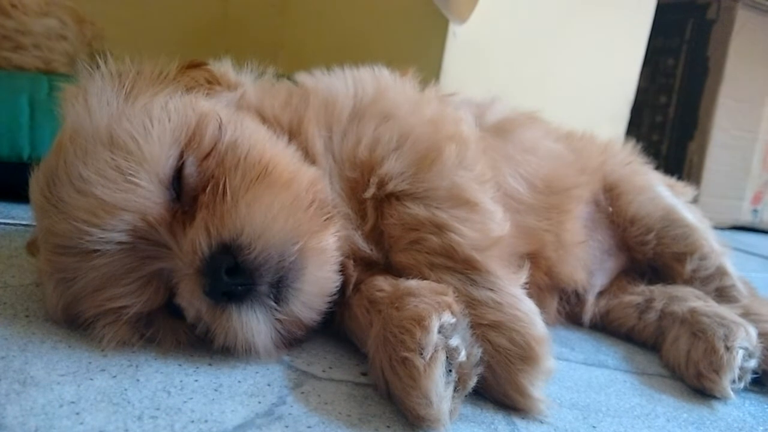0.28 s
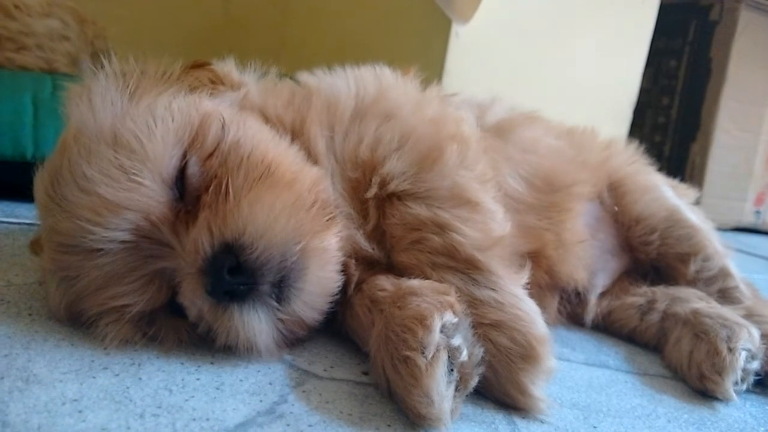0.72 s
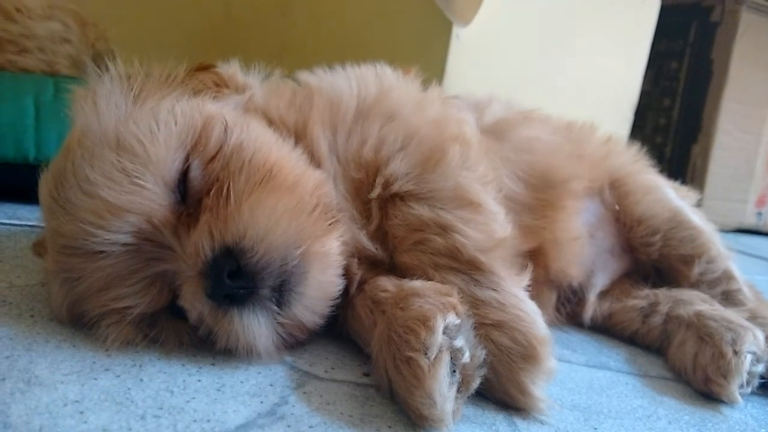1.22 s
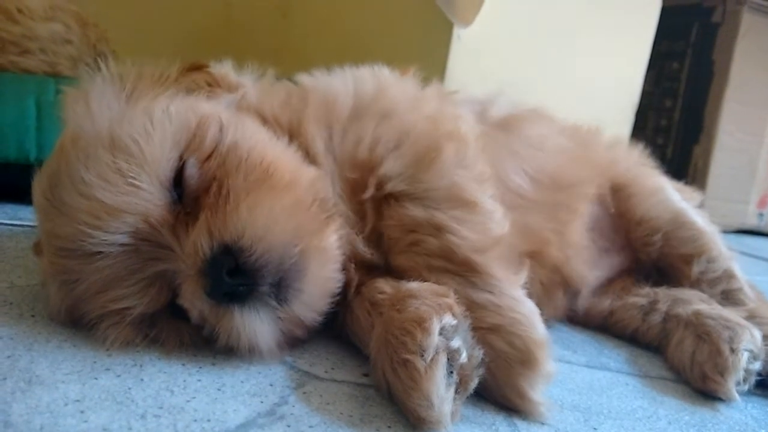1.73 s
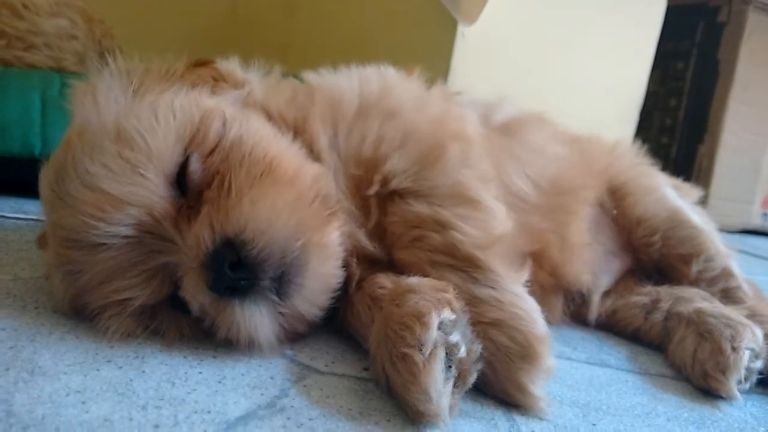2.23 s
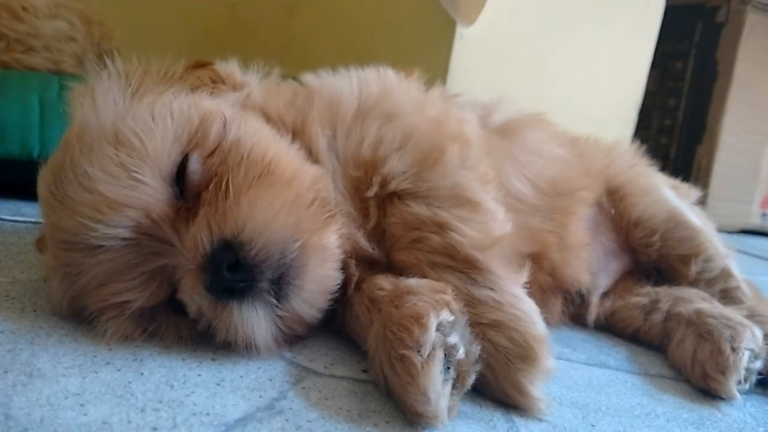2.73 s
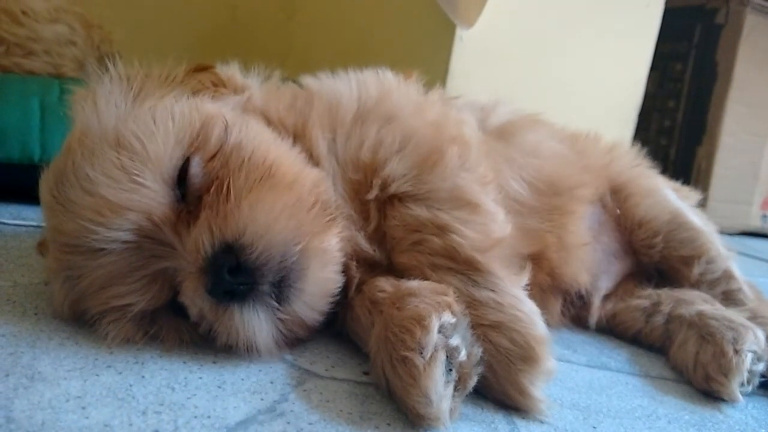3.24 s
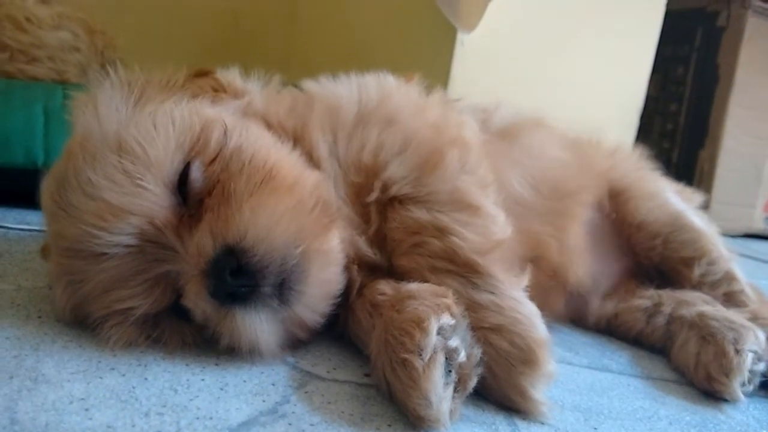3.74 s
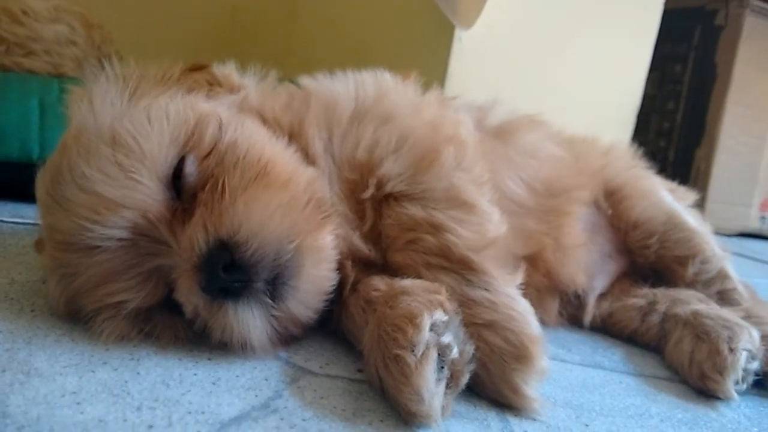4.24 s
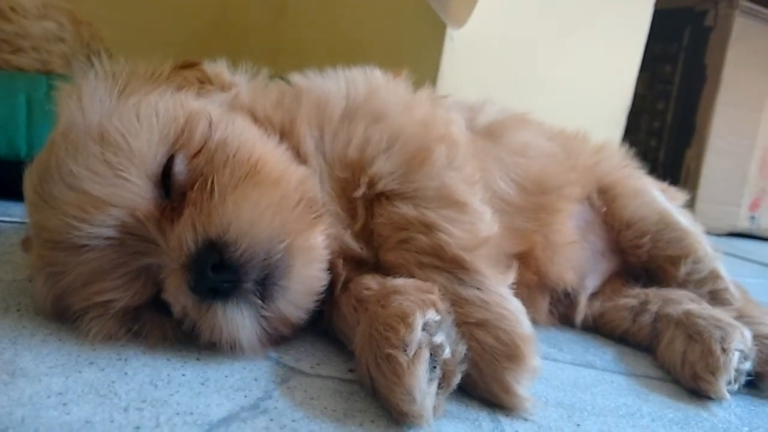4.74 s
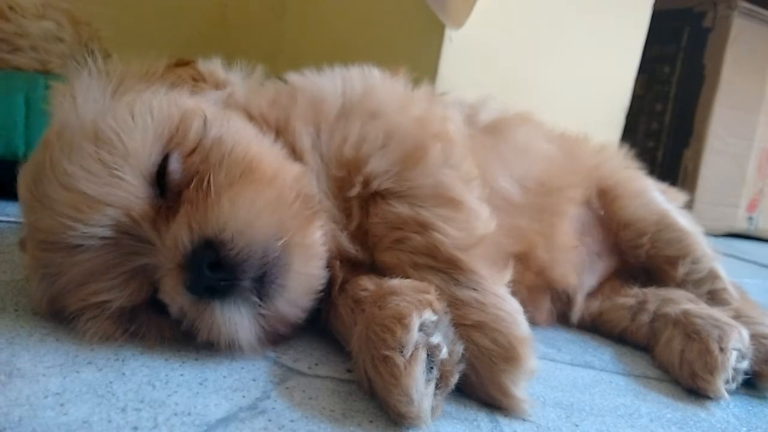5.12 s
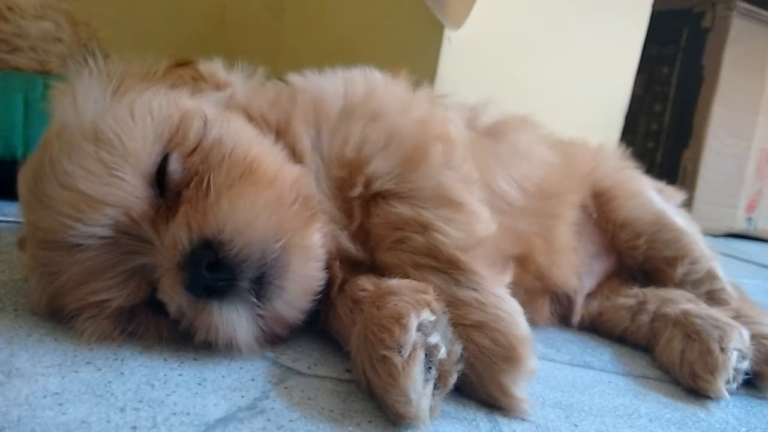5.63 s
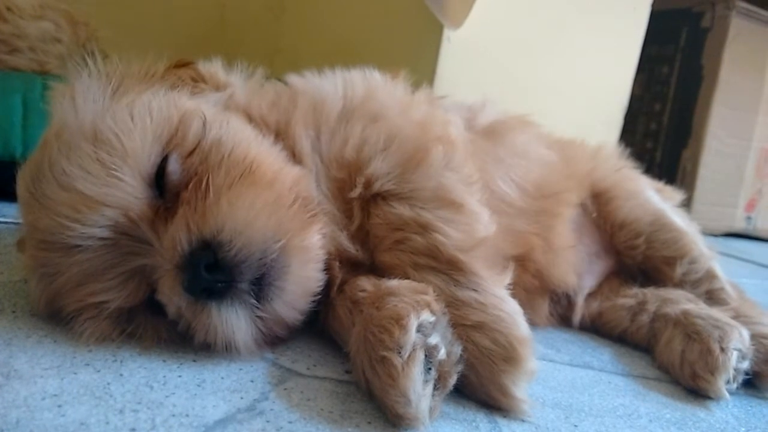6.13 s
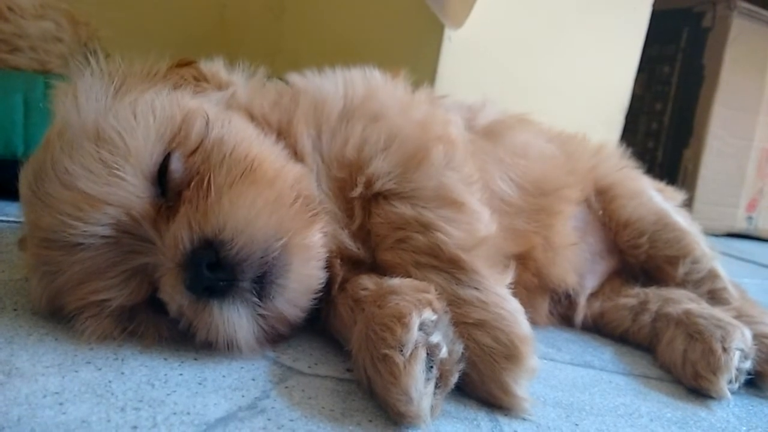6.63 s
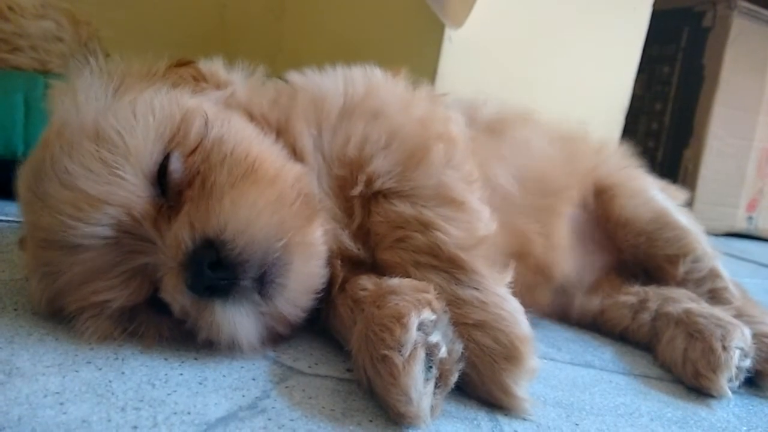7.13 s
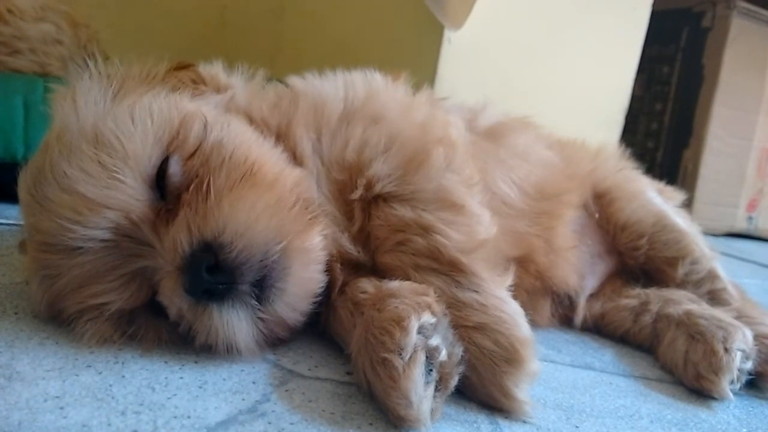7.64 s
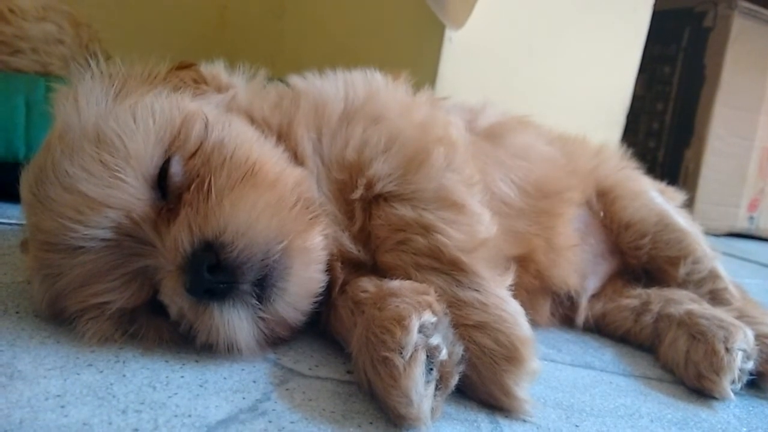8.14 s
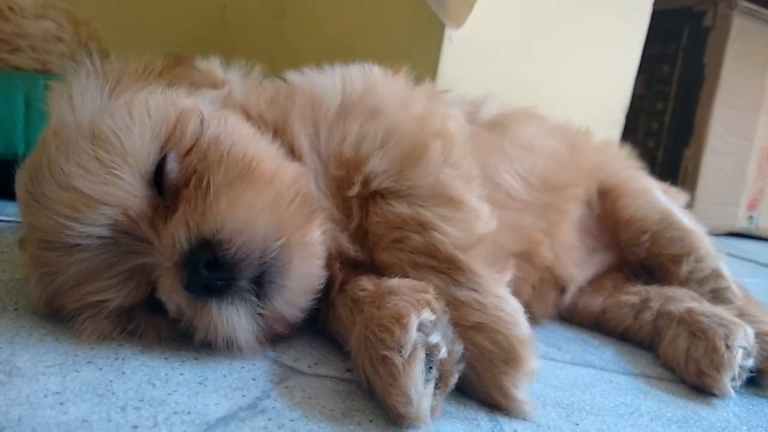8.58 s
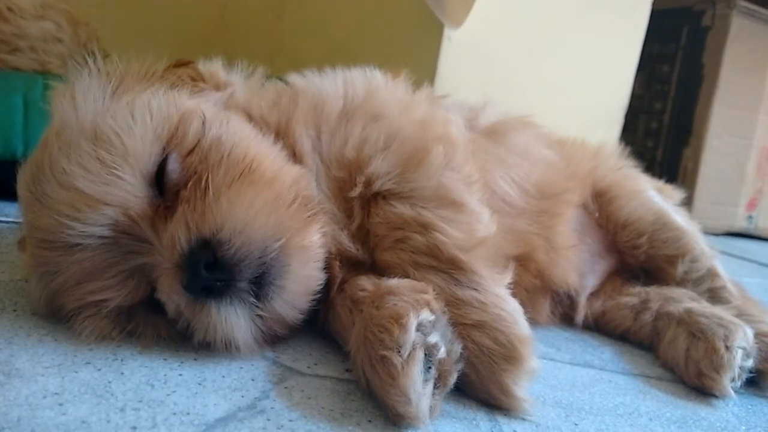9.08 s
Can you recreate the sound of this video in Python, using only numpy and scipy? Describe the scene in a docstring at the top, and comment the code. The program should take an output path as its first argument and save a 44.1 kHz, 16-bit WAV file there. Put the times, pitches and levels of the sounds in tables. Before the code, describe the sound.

A low rumble and faint hiss fill a small room throughout, with a thin sizzle for the first three seconds. A puppy is asleep on the floor, close to the microphone. At about 1.4 seconds it gives a short, fluttering growl that runs straight into two tiny, high yips, each a quick upward glide of an almost pure tone. More pairs follow at about 3.4 and 3.7 seconds, 4.9 and 5.2 seconds, and 6.9 and 7.2 seconds. A last single yip, the loudest, comes at 8.5 seconds. Five of the yips end in a thin whistle through the nose, and small wet mouth clicks and puffs of air surround them. Fur brushes faintly against the mat around 3.7 seconds and again from 5.5 to 6 seconds. Two very soft sniffs come at about 7.7 and 8.7 seconds.

```python
"""A low rumble and a faint hiss fill a small room; for the first three seconds a thin sizzle joins them.
A puppy, dreaming on the floor close to a two-port microphone, gives a short growl as its slack vocal
folds flap. Then the folds tighten for nine tiny yips, four pairs and a last one alone, each a quick
upward glide of a nearly pure tone. Five end in a thin whistle through the nose. Around the yips come
wet mouth clicks, puffs of air, fur brushing the mat and, near the end, two soft sniffs."""
import sys
import numpy as np
from scipy import signal
from scipy.fft import rfft, irfft, next_fast_len
from scipy.io import wavfile
from scipy.ndimage import uniform_filter1d

SR = 44100
rng = np.random.default_rng(int(sys.argv[2]) if len(sys.argv) > 2 else 0)


def wrap_up_sound(samples):
    """Save the sound to the file named by the first command line argument, as 16-bit audio."""
    columns = np.atleast_2d(samples).T
    # keep every value between -1 and 1, then stretch to whole-number steps
    tamed = np.clip(columns, -1, 1)
    steps = np.round(tamed * 32767).astype(np.int16)
    wavfile.write(sys.argv[1], SR, steps)


N = 412750
TIME = np.arange(N) / SR
CUTOFF_HZ = 15800
SIDE = np.array([[.5], [-.5]])   # splits a left-right difference between the two ports

# The gestures of the voice. Each row: start in seconds; times of push, dip, swell, top and end in seconds
# from the start; time of the register break and width of the flick in seconds; starting, head-voice and
# top pitch in Hz; levels in dB at push, dip, swell and top for the fundamental, for the second harmonic
# and for the upper harmonics; fade after the top in dB per second; level of the opening catch in dB.
YIPS = [(1.560, (.003, .019, .056, .082, .093), 0.02, 0.023, (745, 1050, 1470), (-20, -14.5, -25, -36),
        (-30, -46, -38, -24), (-70, -68, -62, -64), 400, -22), (1.758, (.012, .033, .045, .058, .062),
        .005, .016, (1120, 1105, 1730), (-34.5, -44, -27.5, -32.5), (-35, -47, -50, -58),
        (-72, -70, -66, -65), 600, -44), (3.432, (.004, .013, .031, .053, .078),
        0.0023, 0.016, (1070, 1184, 1565), (-33.5, -39, -33, -27), (-39, -30, -29.5, -32),
        (-65, -61, -60, -71), 80, -30), (3.737, (.005, .028, .050, .064, .071),
        .012, 0.0077, (876, 1100, 1880), (-20, -41, -36, -36), (-33.5, -31, -36, -53), (-68, -63, -70, -66),
        500, -38), (4.914, (.004, .012, .035, .057, .064), .003, .014, (1200, 1170, 1720),
        (-37, -39.5, -29, -29), (-45, -43, -31, -37.5), (-72, -74, -64, -61), 300, -27),
        (5.191, (.004, .017, .046, .066, .072), 0.0075, 0.018, (824, 1080, 1770),
        (-19.5, -32.5, -18, -15.5), (-30.5, -37, -28, -31), (-71, -73, -60, -52), 300, -34),
        (6.85, (.004, .018, .038, .058, .085), 0.0065, .022, (1130, 1160, 1605), (-29, -31, -13.5, -11.5),
        (-47, -42, -21, -24), (-70, -70, -42, -36), 302, -37), (7.164, (.006, .026, .054, .067, .073),
        .013, 0.011, (825, 1090, 1744), (-19.5, -28, -27.5, -18.5), (-49, -54, -40.5, -40),
        (-73, -75, -60, -46), 400, -35.5), (8.491, (.005, .016, .039, .064, .081),
        0.011, 0.018, (898, 1147, 1600), (-14, -26.5, -5, -5), (-47, -52, -14.5, -23.5),
        (-70, -53, -31, -32.5), 500, -35.5)]


def from_db(db):
    """Amplitude grows tenfold for every 20 dB."""
    return 10 ** (np.asarray(db) / 20)


def rms_one(x):
    """Normalisation to unit rms."""
    return x / np.sqrt(np.mean(x ** 2) + 1e-20)


def at_hz(points, hz, column=1):
    """Interpolation of a spectrum table on a log-frequency axis."""
    points = np.array(points)
    return np.interp(np.log(np.maximum(hz, 1)), np.log(points[:, 0]), points[:, column])


def envelope(points):
    """A gain that runs linearly in dB between points of time and level."""
    return from_db(np.interp(TIME, *np.transpose(points)))


def filtered(x, response):
    """A linear filter multiplies the spectrum by its frequency response."""
    size = next_fast_len(N + 8192)
    return irfft(rfft(x, size) * response(np.fft.rfftfreq(size, 1 / SR)), size)[..., :N]


def drift(rate, size=N):
    """Random modulation of spread about 1, with `rate` new values a second."""
    steps = np.arange(size) * rate / SR
    count = int(steps[-1]) + 2
    return np.interp(steps, np.arange(count), rng.standard_normal(count))


def noise(colour):
    """White noise filtered to a spectrum of (Hz, dB) points, at unit rms."""
    return rms_one(filtered(rng.standard_normal(N), lambda hz: from_db(at_hz(colour, hz))))


def span(start, length, edge_s):
    """Sample indices, age in seconds and raised-cosine gate of one event."""
    at = np.arange(int((start - edge_s) * SR), int((start + length + edge_s) * SR))
    age = at / SR - start
    inside = np.clip(np.minimum(age, length - age) / edge_s + 1, 0, 1)
    return at, np.clip(age, 0, length), np.sin(np.pi / 2 * inside) ** 2


def knock(low_hz, high_hz):
    """The impulse response of a band-pass filter, scaled to height 1."""
    band = signal.butter(2, [low_hz, high_hz], "band", fs=SR, output="sos")
    pulse = signal.sosfilt(band, signal.unit_impulse(1024))
    return pulse / np.abs(pulse).max()


def ringing(taps, resonances):
    """Impulses excite damped resonances; the narrower the band, the longer it rings."""
    pulse = sum(from_db(level) * knock(max(hz - width / 2, 30), min(hz + width / 2, CUTOFF_HZ))
                for hz, width, level in resonances)
    return signal.oaconvolve(taps, pulse)[:N]


def diffuse(colour, low_hz, high_hz):
    """A diffuse field is partly coherent: the ports share some noise and each has some of its own."""
    # Balance of the field. Each row: frequency in Hz, left minus right level in dB.
    balance = [(60, -2.5), (130, -2.5), (290, -3.5), (640, -0.5), (1410, -1.0), (3100, -1), (6820, -4),
               (15000, -6.5)]
    # Coherence of the ports. Each row: frequency in Hz, share of the power in common.
    coherence = [(30, 0.48), (70, 0.41), (150, 0.39), (300, 0.62), (700, 0.69), (2000, 0.1), (14000, 0.099)]
    # Phase of the common part. Each row: frequency in Hz, left lead in radians.
    lead = [(30, -2), (75, -1.3), (130, -1), (250, 0.5), (14000, 1.5)]

    def shape(hz, share):
        edges = 1 / np.sqrt((1 + (low_hz / (hz + 1)) ** 12) * (1 + (hz / high_hz) ** 12))
        return edges * from_db(at_hz(colour, hz) + SIDE * at_hz(balance, hz)) * np.sqrt(share)

    common = filtered(rng.standard_normal(N),
                      lambda hz: shape(hz, at_hz(coherence, hz)) * np.exp(1j * SIDE * at_hz(lead, hz)))
    own = filtered(rng.standard_normal((2, N)), lambda hz: shape(hz, 1 - at_hz(coherence, hz)))
    return rms_one(common + own)


def rumble(deep_lift_db=5.0, middle_lift_db=2.0):
    """Two low bands of diffuse noise swell and sink under separate envelopes."""
    # Spectrum of the rumble. Each row: frequency in Hz, relative density in dB.
    colour = [(13, -34), (22, -25.5), (48, 2.5), (86, -5), (122, -2), (157, -13), (210, -9.5), (245, -14.5),
              (314, -11.5), (360, -11.5), (509, -12.5), (617, -18), (979, -28), (1440, -28.5),
              (2200, -33.5), (2860, -81), (4840, -120)]
    # Envelopes of the two bands. Each row: time in seconds, level before the lift in dB.
    deep_levels = [(0.0, -58), (0.21, -62), (0.42, -54), (0.65, -51.5), (1.07, -50), (2.71, -50.5),
                   (2.82, -54), (3.49, -51.5), (4.04, -55), (5.47, -47.5), (5.63, -49.5), (6.07, -52.5),
                   (6.54, -55), (6.91, -61), (8.26, -52.5), (8.47, -56.5), (9.12, -57.5), (9.36, -49)]
    middle_levels = [(0.0, -48.5), (1.72, -47), (2.06, -48.5), (3.7, -46.5), (4.82, -50.5), (5.03, -47),
                     (6.07, -51.5), (6.47, -50), (6.7, -52.5), (8.42, -49), (8.6, -52), (9.15, -49),
                     (9.36, -51.5)]
    deep = envelope(deep_levels) * diffuse(colour, low_hz=27, high_hz=100)
    middle = envelope(middle_levels) * diffuse(colour, low_hz=115.6, high_hz=1840)
    return from_db(deep_lift_db) * deep + from_db(middle_lift_db) * middle


def hiss():
    """Broadband diffuse noise in the treble slowly fades."""
    # Spectrum of the hiss. Each row: frequency in Hz, relative density in dB.
    colour = [(1180, -30.5), (2000, -3), (2240, -9), (3220, 1.5), (4000, -3), (5100, -8), (5910, -1),
              (7160, -8), (7410, -7.5), (8360, -3), (9690, -7), (12700, -7), (13700, -2.5), (15500, -13.5),
              (15900, -23)]
    # Its envelope. Each row: time in seconds, level in dB.
    levels = [(0, -55.5), (2.8, -57), (4.2, -59.5), (9.36, -61)]
    return envelope(levels) * diffuse(colour, low_hz=2340, high_hz=17200)


def pulsing(level_db=-73.5, rate_hz=14.0):
    """Amplitude modulation makes a thin band of very high noise pulse."""
    pulses = np.sin(np.pi * rate_hz * TIME) ** 4
    return from_db(level_db) * pulses * noise([(13000, -50.5), (14000, 1.5), (15000, -51.0)])


def hum(flicker_db=2):
    """Two faint sinusoids wander in amplitude and phase."""
    # The steady tones. Each row: frequency in Hz, level in dB.
    tones = [(217, -60), (6960, -78.5)]
    return sum(from_db(level + flicker_db * drift(3.6)) * np.sin(2 * np.pi * hz * TIME + drift(5))
               for hz, level in tones)


def sizzle(level_db=-54, flicker_db=1.5, stutters_per_s=80):
    """Random gating makes a high band of noise stutter, pause, steady and stop."""
    # Spells of sizzling. Each row: start and end in seconds, steadiness (0 half on, 2 nearly always on).
    spells = [(0, .32, .6), (.61, 1.87, .45), (1.87, 2.79, 1.5)]
    # Spectrum of the sizzle. Each row: frequency in Hz, relative density in dB.
    colour = [(5000, -16), (6000, -13), (8500, -6), (10300, -10.5), (11400, -2), (12100, -5), (12800, 0),
              (13300, -1), (13800, -18)]
    chance = drift(stutters_per_s)
    on = sum(1. * ((TIME >= start) & (TIME < end) & (chance < steady)) for start, end, steady in spells)
    gain = uniform_filter1d(on, size=130) * from_db(level_db + flicker_db * drift(300))
    return gain * diffuse(colour, low_hz=5160, high_hz=15000)


def far_tones(waver=0.017, flicker_db=1.5):
    """Distant tones glide under arched envelopes, rising out of the masking rumble and sinking back."""
    # The tones. Each row: start and end in seconds, first and last frequency in Hz, level in dB.
    tones = [(.1, 1.05, 46, 44.9, -44), (0.101, 0.447, 440, 455, -52), (5.306, 5.9, 47.6, 47, -47.5),
             (6.1, 6.752, 122.8, 126, -49.5), (2.82, 3.12, 213, 217, -50.5), (8.081, 8.425, 547, 525, -54),
             (8.207, 8.677, 315, 339.6, -50.5), (8.399, 8.534, 360, 404, -51.5), (8.8, 9.13, 435, 526, -53),
             (9.057, 9.252, 326, 322, -51)]
    out = np.zeros(N)
    for start, end, first_hz, last_hz, level in tones:
        at = np.arange(int(start * SR), int(end * SR))
        along = np.linspace(0, 1, len(at))
        hz = (first_hz + (last_hz - first_hz) * along) * (1 + waver * drift(30, len(at)))
        swell = np.sqrt(np.abs(np.sin(np.pi * along))) * from_db(level + flicker_db * drift(20, len(at)))
        out[at] += np.sqrt(2) * swell * np.sin(2 * np.pi * np.cumsum(hz) / SR)
    return out


def growl(unevenness_db=2.1, rattle_s=0.021, rattle_db=-23, mouth_cutoff_hz=1960):
    """Vocal fry: slack folds flap in pulses, low-passed by the closed mouth, as loose tissue rattles."""
    # Bursts of flapping. Each row: start and end in seconds, pulses per second, level in dB.
    bursts = [(1.3925, 1.431, 146, -18.5), (1.450, 1.475, 137, -22), (1.5015, 1.511, 178, -17),
              (1.538, 1.547, 182, -15.5), (5.142, 5.149, 200, -30)]
    # Resonances of throat and muzzle. Each row: frequency and bandwidth in Hz, gain in dB.
    formants = [(388, 350, -4), (813, 98, -43), (1380, 360, -29), (1860, 150, -26)]
    flaps = np.zeros(N)
    for start, end, rate, level in bursts:
        at = (np.arange(start, end, 1 / rate) * SR).astype(int)
        flaps[at] = from_db(level + unevenness_db * rng.standard_normal(len(at)))
    shaking = signal.lfilter([1], [1, -np.exp(-1 / (rattle_s * SR))], flaps + 1e-18)
    tissue = noise([(110, -29.5), (175, 1.5), (260, -3.5), (390, -1.5), (540, -2.0), (800, -16.0),
                    (1800, -26), (4000, -76)])
    closed_mouth = signal.butter(6, mouth_cutoff_hz, fs=SR, output="sos")
    return from_db(rattle_db) * shaking * tissue - signal.sosfilt(closed_mouth, ringing(flaps, formants))


def catches(lead_s=.0008):
    """Glottal attack: the folds part with a hard little pop as each yip begins."""
    # Resonances of throat and muzzle. Each row: frequency and bandwidth in Hz, gain in dB.
    formants = [(1410, 500, 0.5), (2850, 700, -18)]
    pops = np.zeros(N)
    for start, *_, level in YIPS:
        pops[int((start - lead_s) * SR)] = from_db(level)
    return ringing(pops, formants)


def yip_pitch(age, break_s, top_s, flick_s, start_hz, head_hz, top_hz):
    """Register break: the low voice slides into head voice, creeps up, flicks to its top and sinks."""
    break_width_s, creep_hz_per_s, sink_hz_per_s = 0.0041, 2900, 5000
    head = (1 + np.tanh((age - break_s) / break_width_s / 2)) / 2   # 0 before the break, 1 after
    creep = head_hz + creep_hz_per_s * np.minimum(age, top_s) - sink_hz_per_s * np.maximum(age - top_s, 0)
    flick = np.exp(-np.abs((age - top_s) / flick_s) ** 1.6)
    return start_hz + head * (creep - start_hz) + flick * (top_hz - head_hz - creep_hz_per_s * top_s)


def yip_level(age, marks, levels_db, fade_db_per_s, lead, rise_db=3.5):
    """A harmonic's envelope in dB: push, dip, swell (share `lead` done halfway), top and fade."""
    push_s, dip_s, swell_s, top_s = marks
    push, dip, swell, top = levels_db
    times = [0, push_s, dip_s, (dip_s + swell_s) / 2, swell_s, top_s]
    levels = [push - rise_db, push, dip, dip + lead * (swell - dip), swell, top]
    return np.interp(age, times, levels) - fade_db_per_s * np.maximum(age - top_s, 0)


def yips(jitter=0.008, waver=0.012, shimmer_db=1.56, breath_db=-8, throat_air_db=-28.0):
    """Source and filter: tight folds swing almost as a sine; throat and muzzle shape the overtones."""
    # Responses of the throat and of the muzzle. Each row: frequency in Hz, gain in dB.
    throat = [(1500, 1), (1800, 3), (2100, -2.5), (2350, -5.5), (2520, 1), (2700, -0.5), (2850, -1.5),
              (3000, -6.5), (3250, -10), (3550, -22)]
    muzzle = [(3000, -9), (3600, -9.5), (4200, -6.5), (4900, -6.5), (5500, -3), (6200, 0.5), (6750, -6),
              (7300, -1.5), (7800, -10), (8250, -3), (9000, -19.5), (9900, -21.5), (11150, -6),
              (12300, -22), (13800, -7), (15000, -16.5), (16000, -21)]
    # The pressed third harmonic. Each row: frequency in Hz, level relative to the second in dB.
    pressed = [(2250, -10.5), (2900, -17.5), (3500, -28.5), (4100, -33.0), (4600, -37.5)]
    second_flutter_db, upper_flutter_db, upper_extra_fade_db_per_s = 3.0, 2.5, 500
    second_rasp_rad, upper_rasp_rad = .4, .45   # uneven closures shake the phase
    muzzle_air = noise(muzzle)
    throat_air = noise([(2100, -25.5), (2600, 2.5), (3000, -4.5), (3450, -18), (3950, -9.5), (4600, -24)])
    out = np.zeros(N)
    for start, (*marks, length), break_s, flick_s, pitches, first_db, second_db, upper_db, fade, _ in YIPS:
        at, age, gate = span(start, length, edge_s=.003)
        size = len(at)
        first = yip_level(age, marks, first_db, fade, lead=0.68)
        shaky = np.interp(first, [-28.5, -10.5], [1, 0.41])   # the folds steady when pushed harder
        pitch = yip_pitch(age, break_s, marks[-1], flick_s, *pitches)
        pitch *= 1 + shaky * waver * drift(150, size)
        second = yip_level(age, marks, second_db, fade, lead=0.53) + at_hz(throat, 2 * pitch)
        second += shaky * second_flutter_db * drift(300, size)
        upper = yip_level(age, marks, upper_db, fade + upper_extra_fade_db_per_s, lead=0.8)
        phase = 2 * np.pi * np.cumsum(pitch * (1 + shaky * jitter * drift(700, size))) / SR
        tone = from_db(first) * np.sin(phase)
        tone += from_db(second) * np.sin(2 * phase + second_rasp_rad * drift(600, size))
        tone += from_db(second + at_hz(pressed, 3 * pitch)) * np.sin(3 * phase)
        for k in range(3, 12):
            level = upper + at_hz(muzzle, k * pitch) + upper_flutter_db * drift(200, size)
            tone += from_db(level) * np.sin(k * phase + upper_rasp_rad * drift(1000, size))
        breath = from_db(upper + breath_db) * muzzle_air[at]
        breath += from_db(second + throat_air_db) * throat_air[at]
        breath *= 1 + np.sin(phase)   # each cycle of the folds pulses the air
        shimmer = from_db(shaky * shimmer_db * drift(400, size))
        out[at] += gate * (np.sqrt(2) * tone * shimmer + breath)
    return out


def mouth_clicks():
    """Impulse excitation: wet surfaces part with a dull pop and a bright snap that rings in the muzzle."""
    # Clicks of mouth and nose. Each row: time in seconds, pop level in dB, snap relative to pop in dB.
    clicks = [(1.644, -28, -3), (1.7982, -23.5, -25), (1.840, -29.5, -3), (2.326, -31.5, -19),
              (3.481, -24, -8), (3.794, -24, -21), (4.977, -25, -12), (5.2402, -24, 3.5), (5.247, -25, 2.5),
              (5.523, -43, 3), (5.821, -35.5, -2), (7.229, -26, -5), (7.242, -30, -6)]
    # Resonances under a snap. Each row: frequency and bandwidth in Hz, gain in dB.
    resonances = [(4420, 480, -11.5), (6400, 940, -8.5), (8400, 850, -15), (9100, 6800, -6)]
    pops, snaps = np.zeros((2, N))
    for start, level, treble in clicks:
        pops[int(start * SR)] = from_db(level)
        snaps[int(start * SR)] = from_db(level + treble)
    return signal.oaconvolve(pops, knock(low_hz=266, high_hz=1180))[:N] + ringing(snaps, resonances)


def whistles(lower_ratio=0.774, main_jitter=.009, lower_jitter=.036, rise_hz=400, arch_db=17):
    """Flow tones: air squeezed through the nostrils sings two pitches that rise and droop with the flow."""
    # Nose whistles. Each row: start and length in seconds, top pitch and final droop in Hz,
    # levels of the main and the lower tone in dB.
    calls = [(1.648, 0.026, 13900, 350, -33, -48), (3.481, 0.025, 14350, 1400, -36, -37),
             (4.977, 0.016, 14150, 350, -23.5, -36.5), (6.912, 0.021, 14600, 1500, -26, -35),
             (8.558, .026, 14550, 500, -26, -35.5)]
    crest = .4   # share of the length at which the pitch peaks
    out = np.zeros(N)
    for start, length, top_hz, droop_hz, main_db, lower_db in calls:
        at, age, gate = span(start, length, edge_s=0.0024)
        along = age / length
        drop_db = arch_db * (2 * along - 1) ** 2
        rising = np.maximum(1 - along / crest, 0)
        falling = np.maximum(along - crest, 0) / (1 - crest)
        pitch = top_hz - rise_hz * rising ** 2 - droop_hz * falling ** 2
        for ratio, level, jitter in ((1, main_db, main_jitter), (lower_ratio, lower_db, lower_jitter)):
            phase = 2 * np.pi * np.cumsum(ratio * pitch * (1 + jitter * drift(2000, len(at)))) / SR
            out[at] += np.sqrt(2) * gate * from_db(level - drop_db) * np.sin(phase)
    return out


def nose_puffs(rise_s=.003):
    """Turbulence: the last of a yip's air bursts out of the nose and decays exponentially."""
    # Puffs of air. Each row: start and decay time in seconds, level in dB.
    puffs = [(3.482, 0.055, -44), (3.811, 0.013, -43.5), (5.026, 0.015, -45), (5.238, .012, -44),
             (5.272, 0.02, -46), (6.888, 0.022, -38), (6.913, 0.017, -36), (7.23, 0.019, -43.5),
             (8.516, 0.048, -39), (8.555, 0.022, -31)]
    # Spectrum of the air. Each row: frequency in Hz, relative density in dB.
    colour = [(1500, 0), (3800, -9), (5000, -15), (6500, -3), (9500, -8), (11200, 0.5), (12600, -8.5),
              (14200, -2.5), (16000, -14.5)]
    flow = np.zeros(N)
    for start, decay, level in puffs:
        age = np.maximum(TIME - start, 0)
        flow += from_db(level) * np.minimum(age / rise_s, 1) * np.exp(-np.minimum(age / decay, 50))
    return flow * noise(colour)


def fur(decay_s=0.0023):
    """Friction noise: hairs slip over the mat in tiny soft scuffs as the puppy twitches."""
    # The scuffs. Each row: start in seconds, level in dB.
    scuffs = [(3.559, -56), (3.685, -53), (3.723, -46), (3.856, -53), (5.448, -57), (5.511, -51),
              (5.537, -55), (5.623, -52), (5.649, -56), (5.726, -53), (5.747, -52), (5.985, -49),
              (6.097, -52)]
    # Their spectrum. Each row: frequency in Hz, relative density in dB.
    colour = [(6000, -20), (9000, -8), (11500, 4), (13500, 0), (15500, -14)]
    rub = np.zeros(N)
    for start, level in scuffs:
        at, age, gate = span(start, 10 * decay_s, edge_s=.001)
        rub[at] += from_db(level) * gate * np.exp(-age / decay_s)
    return rub * noise(colour)


def sniffs():
    """Air drawn softly through the nose makes turbulent noise under a bell-shaped envelope."""
    # Intakes of air. Each row: middle and half length in seconds, level in dB.
    intakes = [(7.68, 0.28, -63.5), (8.742, .13, -61)]
    flow = sum(from_db(level) * np.exp(-np.minimum(((TIME - middle) / half) ** 2, 50))
               for middle, half, level in intakes)
    return flow * noise([(2000, -27.0), (2900, -8), (3300, -10), (3700, -14), (4500, -39.5)])


def ports(x):
    """Level and phase differences: each port hears the near source through a response of its own."""
    # The two ports. Each row: frequency in Hz, left minus right level in dB, left lead in radians.
    differences = [(250, 0.5, 1.18), (500, 5, -0.3), (700, 5.5, 1.84), (870, 16.5, 1.65), (1000, 11.5, 1),
                   (1150, 4.5, 0.85), (1340, 0.5, .5), (1452, -13, 0.76), (1530, -9.5, 2.5),
                   (1599, -4.5, 3), (1780, 2, 3.5), (2300, 0.5, 3.5), (2460, -2, 3.5), (2567, -4.5, 3.5),
                   (2580, -9.5, 3), (2830, -13, 3), (2930, -5.5, 1.5), (3200, 0.5, -1), (3750, -1, 1),
                   (4450, -2, -3), (6300, -4, -1.15), (11000, -11.5, -1.5), (14000, -12, -1.5)]

    def response(hz):
        gains = from_db(SIDE * at_hz(differences, hz))
        phase = SIDE * at_hz(differences, hz, column=2)
        return gains / np.sqrt(np.mean(gains ** 2, axis=0)) * np.exp(1j * phase)

    return filtered(x, response)


def room(x, early_db=-17.0, early_t60=0.28, late_db=-18.5, late_t60=0.83, wall_hz=1850):
    """Reverberation: quick bright reflections from floor and boxes, then a duller tail from the walls."""
    # What the room gives back. Each row: frequency in Hz, gain in dB.
    colour = [(300, -2), (780, 5), (1000, 0.5), (1250, 2), (1520, 0), (1800, -3.5), (2600, -5), (3200, -1),
              (7000, 2), (14000, -2)]
    t = np.arange(SR) / SR
    early, late = rng.standard_normal((2, 2, SR)) * (t > .004)   # the first echo takes 4 ms
    early = from_db(early_db) * rms_one(early * from_db(-60 * t / early_t60))
    late = from_db(late_db) * rms_one(late * from_db(-60 * t / late_t60))
    late = signal.sosfilt(signal.butter(3, wall_hz, fs=SR, output="sos"), late)
    sent = filtered(x, lambda hz: from_db(at_hz(colour, hz)))
    return signal.fftconvolve(sent[None], (early + late) / np.sqrt(SR), axes=1)[:, :N]


def scene():
    """Superposition of the puppy's direct sound, its reverberation and the background."""
    puppy = yips() + catches() + whistles() + growl() + mouth_clicks() + nose_puffs() + sniffs() + fur()
    near = ports(puppy) + room(puppy)
    rightward = from_db([[-2.0], [1.5]])
    background = rumble() + hiss() + rightward * (pulsing() + hum()) + sizzle() + rightward * far_tones()
    return near + background


def record(dry, limit_db=-9, recovery_db_per_s=8.5):
    """A limiter ducks at once above its threshold and recovers slowly; a steep low-pass cuts the top."""
    power = uniform_filter1d(np.mean(dry ** 2, axis=0), size=180)
    over_db = np.maximum(10 * np.log10(np.maximum(power, 1e-12)) - limit_db, 0)
    held_db = np.maximum.accumulate(over_db + recovery_db_per_s * TIME) - recovery_db_per_s * TIME
    low_pass = signal.ellip(10, .1, 80, CUTOFF_HZ, fs=SR, output="sos")
    return signal.sosfilt(low_pass, dry * from_db(-held_db))


dry = scene()
out = record(dry)
wrap_up_sound(out)
```